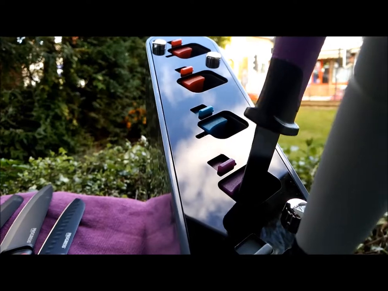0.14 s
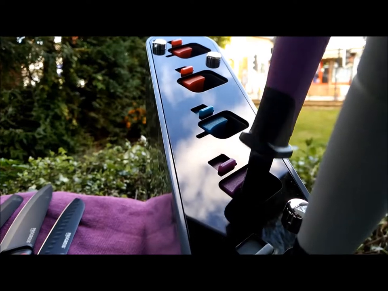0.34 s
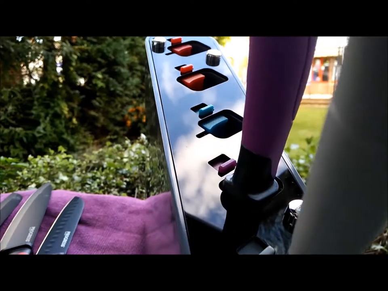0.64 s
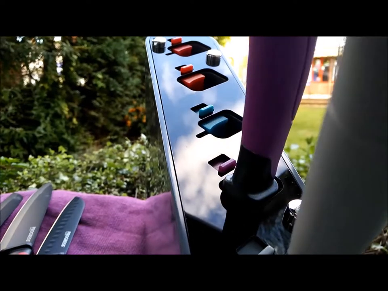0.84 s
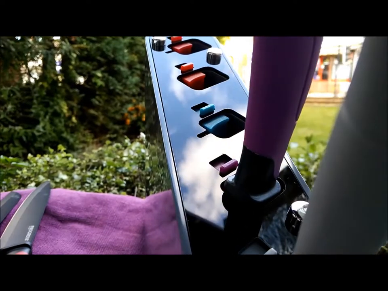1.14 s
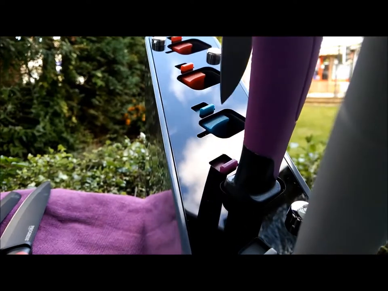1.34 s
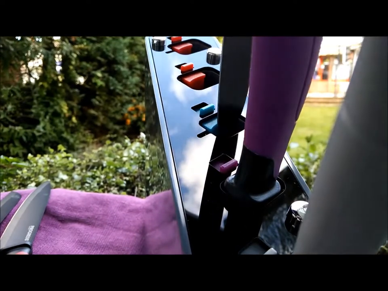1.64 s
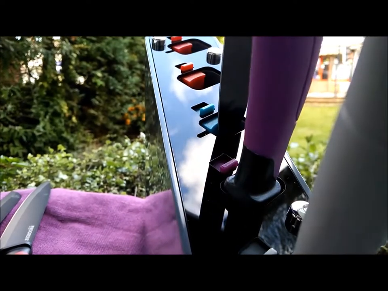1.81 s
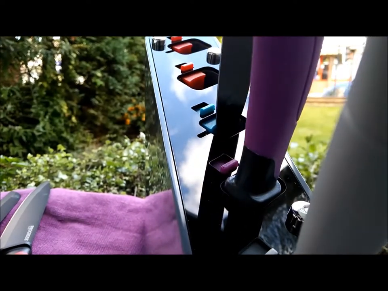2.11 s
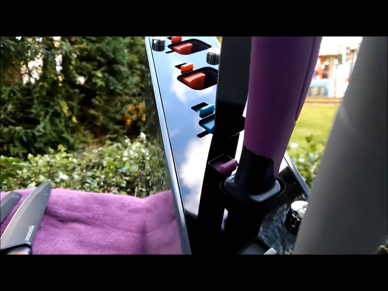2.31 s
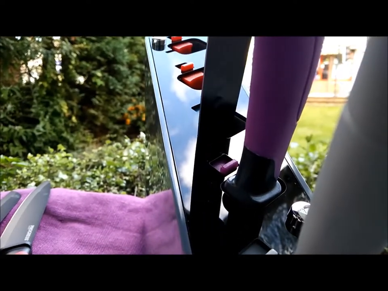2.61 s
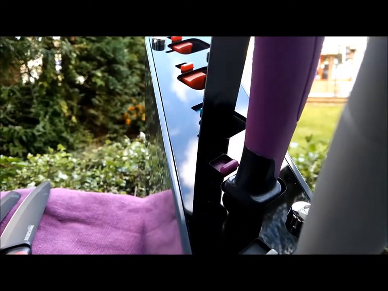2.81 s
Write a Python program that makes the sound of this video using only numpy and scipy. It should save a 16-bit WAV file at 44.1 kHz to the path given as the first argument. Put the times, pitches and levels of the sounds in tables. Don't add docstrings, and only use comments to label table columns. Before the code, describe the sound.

Close stereo outdoor sound: short gritty scrape, hard bright steel-on-plastic clack, hollow rattling knocks dying fast, then a pause with distant engine hum and soft airy wash, and finally tiny ticks of a second, smaller knife.

```python
import sys
import numpy as np
from scipy import signal
from scipy.fft import rfft, irfft
from scipy.io import wavfile
from scipy.ndimage import uniform_filter1d

SR = 44100
rng = np.random.default_rng(int(sys.argv[2]) if len(sys.argv) > 2 else 0)


def boost(x):
    u = np.asarray(x, float) / 20
    return 10 ** u


def log_audio(samples):
    frames = np.atleast_2d(samples).T
    limited = np.clip(frames, -1, 1)
    pcm = np.round(limited * 32767).astype(np.int16)
    wavfile.write(sys.argv[1], SR, pcm)


N = 130095
RISE_S = 0.00092
LAG_S = 0.000158


# [t/s, peak level/dB, crack f/Hz, thud level/dB, rattle t/s]
HITS = [(.5440, -21.5, 6470, -28.5, 0.0012), (0.5453, -16, 5100, -21, 0.001),
        (.5472, -4.5, 7800, -36, 0.001), (.5484, -8.5, 8100, -29, 0.0015),
        (.5497, -11.5, 2580, -31, 0.00081), (0.5532, -23, 5800, -9, 0.0022),
        (0.5568, -25.5, 8100, -10, 0.0017), (.5605, -28.5, 8250, -5, 0.0025),
        (0.5652, -24.5, 6760, 1.5, 0.0016), (.589, -28.5, 6500, -0.5, 0.0014),
        (0.5937, -26, 6600, -4, 0.0032), (0.609, -30.5, 8000, -4.5, .004),
        (.6312, -22.5, 8950, -10.5, 0.0057), (0.6384, -31, 7000, 1, .003), (.645, -37, 7500, 10, 0.0046),
        (0.679, -31.5, 7050, -6, 0.0022), (.690, -27, 4580, 2.5, 0.0023), (0.697, -46, 4500, -2, 0.0023),
        (0.736, -26.5, 6060, -1, 0.0013), (0.747, -33.5, 5740, 7, 0.0031),
        (0.7725, -39.5, 6500, 2.5, 0.0014)]
# [t/s, peak level/dB, crack f/Hz, thud level/dB, rattle t/s]
KNOCKS = [
    (.609, -18.5, 2120, -1.5, 0.0046),
    (0.6168, -29, 1260, 5, 0.0043),
    (.621, -26, 2420, -2.5, 0.0039),
    (0.6301, -15, 4070, -10, 0.0044),
    (0.684, -24.5, 2200, -7.5, 0.0035),
    (0.73, -37, 4800, -3, .006),
    (0.749, -32, 4660, -10, .003),
    (0.731, -25, 2320, -7, 0.0027),
    (0.772, -27, 2390, -6, 0.0035),
    (0.796, -33.5, 2420, -3, 0.0044),
]
# [f/Hz, level/dB, time to fall 60 dB t/s]
BLADE = [(1814, -14, 0.033), (2540, 2.5, 0.047), (3125, 7, 0.047), (3260, -5, 0.026), (4357, 6, .045),
         (5000, -5.5, .04), (5120, -4.5, .05), (5600, -5.5, .03), (6300, -2.5, .045), (7020, -3, .035),
         (7630, 2, 0.03), (8540, 4, 0.031), (9940, -1, 0.023), (10800, -11, .03)]
# [t/s, level/dB]
SLIDE_IN = [
    (.406, -49),
    (.416, -55.5),
    (.48, -50.5),
    (.505, -43),
    (.518, -36),
    (.534, -39.5),
    (.544, -58),
]
# [t/s, level/dB]
SETTLE = [
    (.566, -55),
    (.585, -44.5),
    (.6, -29),
    (.62, -46.5),
    (.64, -38),
    (.66, -74),
    (.70, -42.5),
    (.715, -77),
]
# [f/Hz, width f/Hz, level/dB]
SLOT_IN = [(3790, 54, 2), (4400, 1200, 9.5), (6590, 200, 5.5), (7700, 400, -4), (9800, 200, -6.5),
           (11900, 650, -31)]


def first_knife():
    out = np.zeros((2, N))
    held = np.array(BLADE) * [1, 1, 0.61]
    for s, *rest in HITS:
        is_free = s < SETTLE[0][0]
        blade, ring_db = (BLADE, 6) if is_free else (held, 0)
        add(out, s - RISE_S, blow(blade, ring_db, 0, *rest))
    for s, *rest in KNOCKS:
        add(out, s - RISE_S, blow(held, 0, -25, *rest))
    add(out, *slide(SLIDE_IN, SLOT_IN, 2600))
    add(out, *slide(SETTLE, SLOT_IN, 900))
    return out


# [f/Hz, level/dB, time to fall 60 dB t/s]
SEAT = [(155, -5, .08), (213, 6, .14), (252.5, -1.5, .6), (405, -3, .1), (603, -9, .1)]


def block_jolt():
    out = np.zeros((2, N))
    seat_s, level_db, rise_s = .548, -24, 0.011
    jolt = modes(SEAT, 0, 0, count=24000)
    t = np.arange(jolt.shape[1]) / SR
    swell = np.sin(np.pi / 2 * np.minimum(t / rise_s, 1)) ** 2
    add(out, seat_s, boost(level_db) * jolt * swell)
    return out


# [t/s, peak level/dB, crack f/Hz, steel level/dB, rattle t/s]
TICKS = [(2.3053, -41, 1690, -1, 0.0036), (2.329, -46, 6000, -3, .004), (2.401, -29.5, 2830, 1.5, .006),
         (2.409, -40, 3000, -6, .003), (2.459, -40, 2930, -10, 0.0088), (2.497, -40, 2900, -15, 0.0078),
         (2.502, -46, 3300, -12, .008), (2.5417, -46, 1720, -6, .004), (2.586, -42.5, 1710, -6, .004),
         (2.61, -44, 2480, -6, .004), (2.7517, -51, 5640, -3, .005), (2.7776, -40.5, 2970, -6, 0.0039),
         (2.8415, -40.5, 1175, -5, 0.0043), (2.8784, -49, 2200, -15, .005), (2.886, -38.5, 7700, 1, 0.0027),
         (2.896, -34.5, 8300, -3, .004), (2.901, -41, 5800, -3, 0.0033), (2.9009, -34, 2520, -5, 0.0076)]
# [f/Hz, level/dB, time to fall 60 dB t/s]
SMALL_BLADE = [(1740, 1, 0.04), (2550, 1, 0.035), (2950, 2, 0.04), (3750, -5, .025), (4940, -4, .025),
               (5700, -5, 0.025), (7130, -9, .02), (8300, -8, .025), (10900, -11, .025),
               (13050, -10, 0.035)]
# [t/s, level/dB]
SLIDE_LATE = [(2.42, -66.5), (2.5, -60.5), (2.57, -66), (2.6, -58.5), (2.64, -66), (2.73, -63),
              (2.755, -55.5), (2.8, -54), (2.83, -59), (2.89, -57), (2.95, -62.5)]
# [f/Hz, width f/Hz, level/dB]
SLOT_LATE = [(2990, 170, 5.5), (5500, 1300, 6), (8060, 200, -6), (13000, 150, -8)]


def second_knife():
    out = np.zeros((2, N))
    ring_db, thud_db = 3, -21
    for s, peak_db, crack_hz, steel_db, rattle_s in TICKS:
        tick = blow(SMALL_BLADE, ring_db, steel_db, peak_db, crack_hz, thud_db, rattle_s)
        add(out, s - RISE_S, tick)
    add(out, *slide(SLIDE_LATE, SLOT_LATE, 2170))
    return out


# [f/Hz, level/dB, time to fall 60 dB t/s]
BLOCK = [(445, -3, 0.1), (543, 3.5, 0.052), (591, 1.5, 0.081), (863, -4.5, 0.11), (1145, -1.5, 0.053),
         (1636, -5, 0.033)]


def blow(blade, ring_db, steel_db, peak_db, crack_hz, thud_db, rattle_s):
    tail_db, tail_s = -13.5, 0.014
    snap_db, crack_db, woody_db = -6.5, 4.5, -0.5
    t = np.arange(6000) / SR
    fade = np.exp(-t / rattle_s) + boost(tail_db) * np.exp(-t / tail_s)
    chatter = pair(len(t)) * np.minimum(t / RISE_S, 1) * fade

    contact = np.arange(len(t)) == round(RISE_S * SR)
    drive = contact + .12 * chatter[:1]
    ring = struck(drive, blade)
    thud = struck(drive, BLOCK) + boost(woody_db) * peaked(bright(chatter, (365, 2200)))

    crack_width = crack_hz / 2.1
    crack = resonate(chatter, crack_hz, crack_width)
    crack = resonate(crack, crack_hz, crack_width)
    steel = boost(ring_db) * ring + boost(snap_db) * peaked(bright(chatter))
    top = boost(steel_db) * steel + boost(crack_db) * peaked(crack)
    return boost(peak_db) * (peaked(top) + boost(thud_db) * thud)


def struck(drive, table):
    ring = modes(table, vary_db=2, scatter_rad=0.89)
    return peaked(signal.fftconvolve(drive, ring, axes=1)[:, :drive.shape[1]])


def modes(table, vary_db, scatter_rad, count=6000):
    hz, db, t60 = np.transpose(table)[:, :, None]
    t = np.arange(count) / SR
    db = db + vary_db * rng.standard_normal(hz.shape)
    scatter = scatter_rad * np.minimum(hz / 700, 1) * rng.standard_normal(hz.shape)
    skew = 2 * np.pi * hz * LAG_S + scatter
    fade = boost(db - 60 * t / t60)
    left = (fade * np.sin(2 * np.pi * hz * t)).sum(0)
    right = (fade * np.sin(2 * np.pi * hz * t - skew)).sum(0)
    return np.array([left, right])


def slide(pressure, slot, low_hz):
    grit_per_s, grit_db, catch_db, rub_db = 6700, -1.5, 2, -13.5
    s, db = np.transpose(pressure)
    t = np.arange(s[0], s[-1], 1 / SR)
    chance, size, drift = rng.random((len(t), 3)).T
    catch = uniform_filter1d(drift - .5, size=150)
    catch = evened(uniform_filter1d(catch, size=150))
    grain = boost(-grit_db * np.log(size) + catch_db * catch)
    grit = pair(len(t)) * (chance < grit_per_s / SR) * grain
    bands = sum(boost(g) * np.sqrt(500 / w) * resonate(grit, f, w) for f, w, g in slot)
    singing = evened(bright(bands, (low_hz, 13000)))
    sound = evened(singing + boost(rub_db) * evened(bright(grit)))
    fade_in = np.minimum((t - s[0]) / 0.0044, 1)
    return s[0], sound * boost(np.interp(t, s, db)) * fade_in


def knives():
    near_side_db = 3.5
    sides = boost(np.array([[near_side_db / 2], [-near_side_db / 2]]))
    return (first_knife() + block_jolt() + second_knife()) * sides


# [t/s, firing f/Hz, level/dB]
ENGINE = [(0, 77, -44.5), (.18, 74.1, -44), (.3, 73.5, -38), (.65, 73.35, -29.5), (.9, 72.9, -30.5),
          (1.08, 72.1, -35.5), (1.191, 73.5, -44), (1.279, 71.1, -44), (1.38, 68.9, -50), (1.68, 69.5, -52),
          (1.88, 65.46, -41.5), (2.15, 64.93, -39.5), (2.3, 64.63, -48.5)]
# [t/s, level/dB]
SECOND = [
    (1.9, -70),
    (2.15, -47),
    (2.3, -46),
    (2.95, -46),
]
SWELLS_S = [1.95, 2.07, 2.191, 2.31, 2.41, 2.545, 2.665, 2.78, 2.875, 2.97]


def engines():
    t = np.arange(N) / SR
    s, hz, db = np.transpose(ENGINE)
    phase = 2 * np.pi * np.cumsum(np.interp(t, s, hz)) / SR
    beat = 2 * np.pi * np.interp(t, SWELLS_S, np.arange(len(SWELLS_S)))
    near = boost(np.interp(t, s, db)) * np.sin(phase)
    far = boost(np.interp(t, *np.transpose(SECOND))) * np.sin(phase - beat)
    return np.sqrt(2) * (near + far)


# [middle t/s, length t/s, f/Hz, width f/Hz, level/dB]
DRONES = [
    (1.985, 0.29, 112, 3, -46.5),
    (1.855, 0.2, 166, 4.2, -48.5),
    (1.88, 0.09, 206, 12, -48),
    (2.217, 0.14, 148, 7.5, -54),
    (2.36, 0.33, 140, 6.6, -53),
    (2.06, 0.58, 3350, 130, -68),
    (2.322, 0.058, 836, 160, -51.5),
    (0.11, 0.26, 176, 23, -60),
]


def drones():
    t = np.arange(N) / SR
    out = np.zeros(N)
    for middle, length, hz, width, db in DRONES:
        tone = resonate(rng.standard_normal(N), hz, width)
        tone = resonate(tone, hz, width)
        tone /= np.sqrt(abs(uniform_filter1d(tone ** 2, size=4000)) + 1e-12)
        out += boost(db) * tone * np.exp(-((t - middle) / (length / 2)) ** 2)
    return out


def gust():
    middle_s, width_s, level_db = 1.18, .008, -38
    u = (np.arange(N) / SR - middle_s) / width_s
    return boost(level_db) * u * np.exp(-u ** 2 / 2)


def road():
    return (engines() + drones() + gust()) * boost(np.array([[.6], [-.6]]))


def tyres():
    noise = rng.standard_normal((N, 2)).T
    return boost(-57) * evened(resonate(noise, 851, 124))


# [f/Hz, level per Hz/dB]
WASH = [(20, -55), (45, -13), (70, -7), (170, -11), (265, -14), (300, -22.5), (780, -22.5), (1500, -30)]
# [f/Hz, level per Hz/dB]
AIR = [(590, -59), (1000, -2.5), (1220, -6), (1750, -4), (3980, -19), (7350, -20), (8850, -25),
       (13800, -39), (15000, -41)]


def garden():
    low = [p for p in WASH if p[0] < 1400] + [(1500, WASH[-1][1] - 6)]
    return outdoors(low, -49, 0.7, 90) + outdoors(AIR, -57.5, 0.61, 1450)


# [t/s, level/dB]
TRAFFIC = [
    (0, 1),
    (.5, 2.5),
    (.9, 3.5),
    (1.4, 0.5),
    (1.9, 1),
    (2.3, 2),
    (2.95, -0.5),
]
# [f/Hz, likeness from -1 to 1]
SAME = [(60, 0.93), (180, 1), (550, 0.53), (1650, -0.17), (4970, 0.033), (15000, -0.21)]


def outdoors(spectrum, level_db, follow, lo_hz):
    patchy_db = 1.2
    frames, hz = N // 512 + 5, np.fft.rfftfreq(2048, 1 / SR)
    a, b, c, d, patch = rng.standard_normal((frames, 1025, 5)).T
    patch = uniform_filter1d(patch, size=16, axis=0)
    patch = evened(uniform_filter1d(patch, size=8, axis=1))
    same = np.clip(read(SAME, hz), -1, 1)[:, None]
    left = a + 1j * b
    right = same * left + np.sqrt(1 - same ** 2) * (c + 1j * d)
    colour = boost(read(spectrum, hz)) * (hz >= spectrum[0][0]) * (hz <= spectrum[-1][0])
    z = np.array([left, right]) * colour[:, None] * boost(patchy_db * patch)
    x = signal.istft(z, nperseg=2048, noverlap=1536)[1][:, :N]
    share = np.sqrt((colour ** 2).sum() / (colour[hz > lo_hz] ** 2).sum())
    activity_db = np.interp(np.arange(N) / SR, *np.transpose(TRAFFIC))
    return evened(x) * share * boost(level_db + follow * activity_db)


def pair(count):
    a, b = rng.standard_normal((count, 2)).T
    return np.array([a, .7 * np.roll(a, round(LAG_S * SR)) + .7 * b])


def resonate(x, hz, width):
    turn = np.exp(2j * np.pi * hz * np.arange(x.shape[-1]) / SR)
    r = np.exp(-np.pi * width / SR)
    return 2 * (turn * signal.lfilter([1 - r], [1, -r], x / turn)).real


def bright(x, band_hz=(2000, 12000)):
    return signal.sosfilt(signal.butter(3, band_hz, "band", fs=SR, output="sos"), x)


def evened(x):
    return x / np.sqrt(np.mean(x ** 2) + 1e-20)


def peaked(x):
    return x / abs(x[0]).max()


def read(points, hz):
    f, value = np.transpose(points)
    return np.interp(np.log(hz + 1), np.log(f + 1), value)


def add(mix, s, sound):
    part = mix[:, round(s * SR):][:, :sound.shape[1]]
    part += sound[:, :part.shape[1]]


def scene():
    return knives() + road() + tyres() + garden()


def band_limit(x):
    return signal.sosfilt(signal.butter(12, 16670, fs=SR, output="sos"), x)


def record(dry):
    knee_db, duck, recover_db_per_s = -30, .3, 5
    edge_hz, above_edge_db = 15500, -16
    power_db = 10 * np.log10(abs(uniform_filter1d((dry ** 2).mean(0), size=800)) + 1e-12)
    fall = np.arange(N) * recover_db_per_s / SR
    held_db = np.maximum.accumulate(duck * (power_db - knee_db) + fall)
    over_db = np.maximum(held_db - fall, 0)
    late_db = np.roll(uniform_filter1d(over_db, size=800), 900)
    treble_db = above_edge_db * (np.fft.rfftfreq(N, 1 / SR) > edge_hz)
    mix = irfft(rfft(dry) * boost(treble_db), N) / boost(late_db)
    return band_limit(mix)


dry = scene()
out = record(dry)
log_audio(out)
```